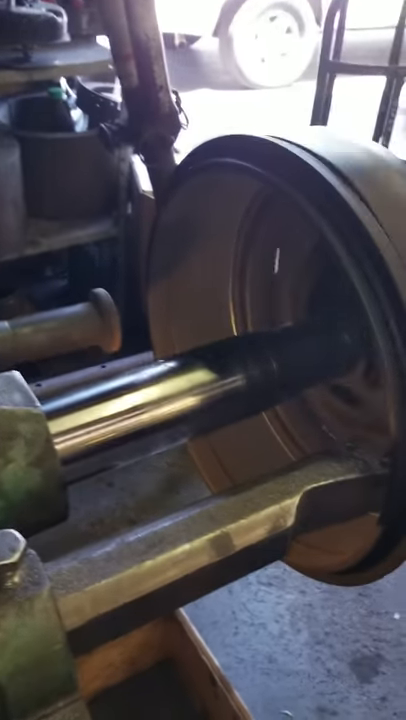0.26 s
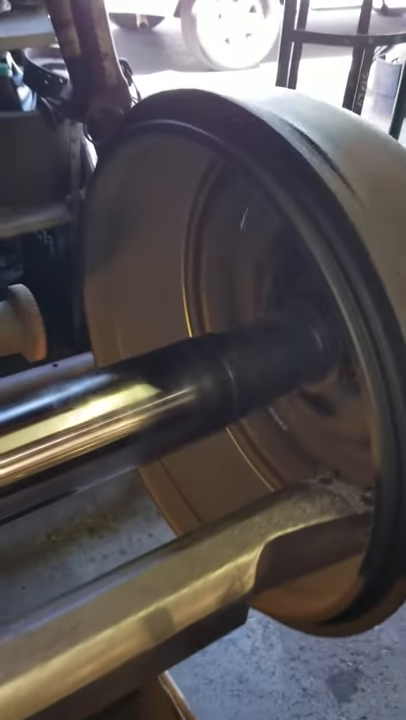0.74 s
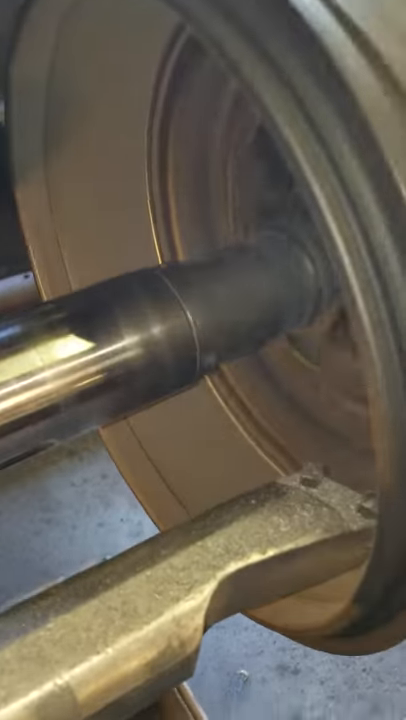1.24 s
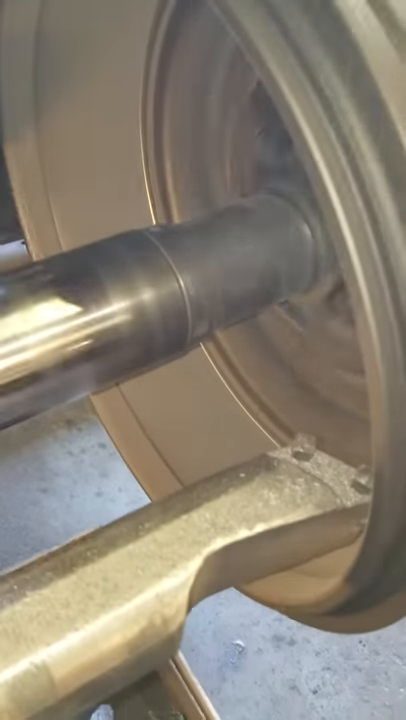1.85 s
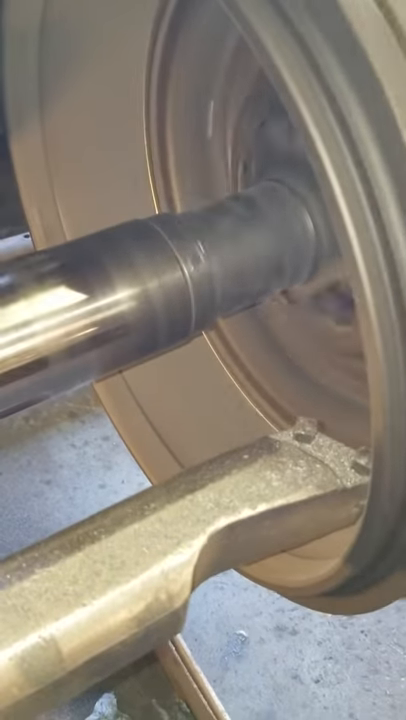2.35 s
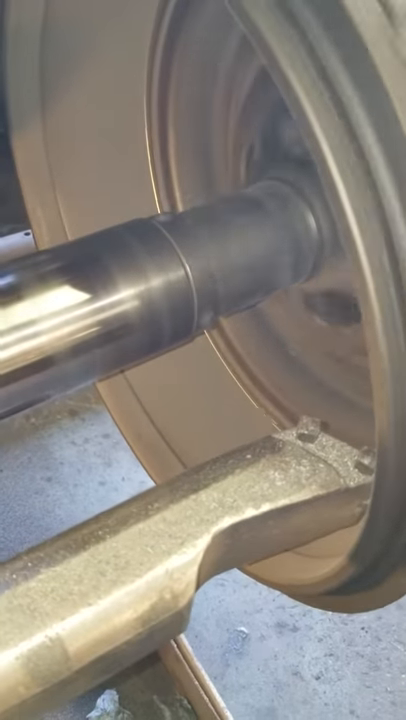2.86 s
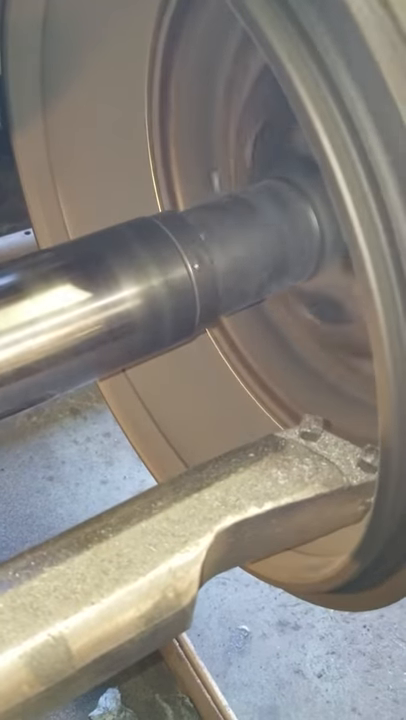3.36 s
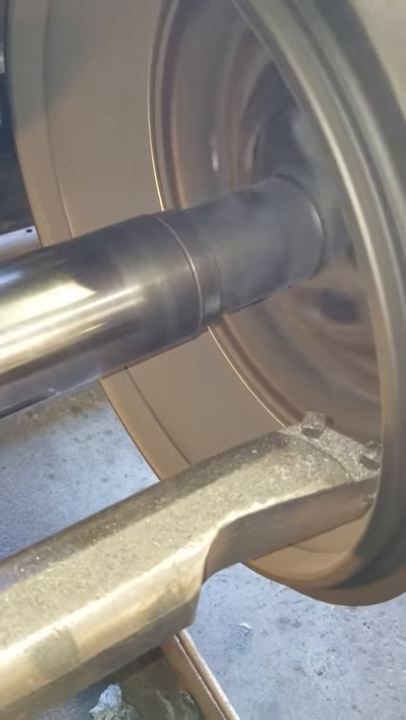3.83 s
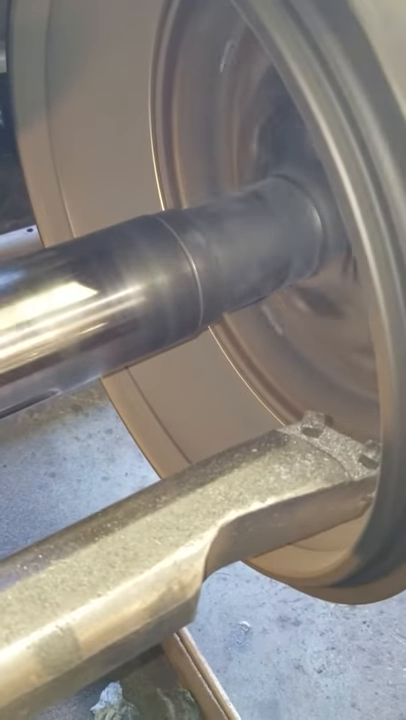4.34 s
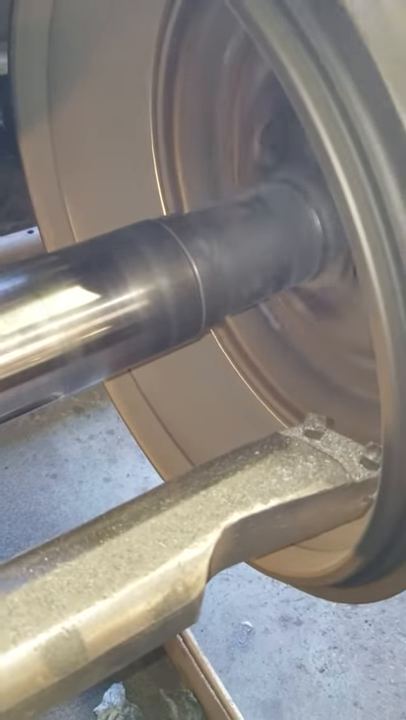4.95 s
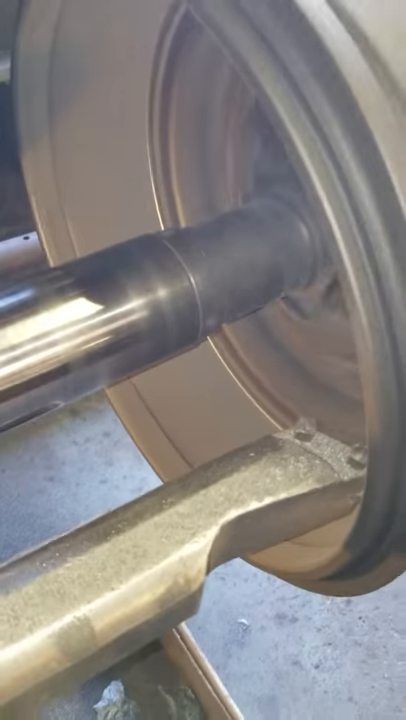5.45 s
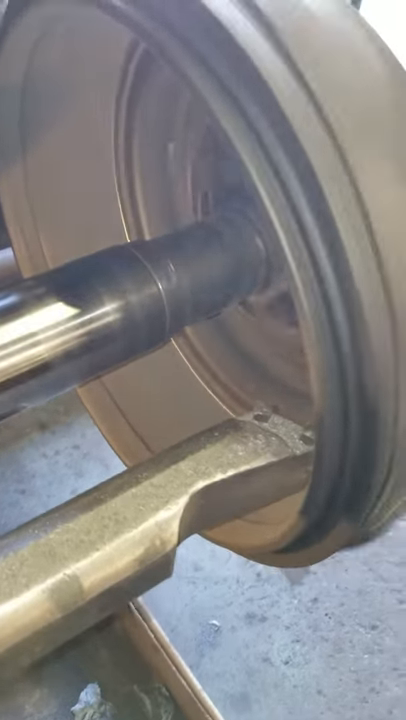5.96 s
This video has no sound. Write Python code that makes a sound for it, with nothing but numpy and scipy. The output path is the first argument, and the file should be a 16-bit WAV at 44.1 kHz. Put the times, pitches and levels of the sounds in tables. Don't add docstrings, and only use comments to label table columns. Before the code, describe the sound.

A brake lathe skims a spinning metal drum with a ragged, very high metallic squeal over a low motor rumble and hum in a workshop.

```python
import sys
import numpy as np
from scipy import signal
from scipy.io import wavfile

SR = 44100
rng = np.random.default_rng(int(sys.argv[2]) if len(sys.argv) > 2 else 0)


def gain_from_db(level_db):
    decades = np.asarray(level_db, float) / 20
    return 10 ** decades


def unload_wav(signal):
    wavfile.write(
        sys.argv[1],
        SR,
        np.round(np.clip(np.atleast_2d(signal).T, -1, 1) * 32767).astype(np.int16),
    )


N = 273420
STEP = 60
STEPS = N // STEP

# t/s, stance (0 far, 1 close, 2 backing off)
STANCE = [
    (0, 0.),
    (.6, 0.56),
    (.9, 1.3),
    (1.15, 1.3),
    (1.4, 1.04),
    (4.9, 1.1),
    (5.3, 1.24),
    (5.65, 1.4),
    (6.2, 2.1),
]


def in_time(rows):
    s, *columns = np.transpose(rows)
    return [np.interp(np.arange(STEPS) * STEP / SR, s, column) for column in columns]


def at_hz(points, hz):
    f, value = np.transpose(points)
    return np.interp(np.log(hz), np.log(f), value)


def rms_one(x):
    return x / np.sqrt(np.mean(np.abs(x) ** 2) + 1e-20)


def drift(rate_hz):
    r = np.exp(-2 * np.pi * rate_hz * STEP / SR)
    settle = 500
    noise = rng.standard_normal(STEPS + settle)
    return rms_one(signal.lfilter([1], [1, -2 * r, r * r], noise)[settle:])


def scaled(x, control):
    return (x.reshape(STEPS, STEP) * control[:, None]).ravel()


def swells(rows):
    t = np.arange(STEPS) * STEP / SR
    return sum(db * np.exp(-(2 * (t - s) / length) ** 2) for s, db, length in rows)


def mode(force, hz, width_hz):
    pole = np.exp((-np.pi * width_hz / .644 + 2j * np.pi * hz) / SR)
    return np.sqrt(2) * rms_one(signal.lfilter([1], [1, -2 * pole, pole * pole], force))


def cutting_force(count, chip_db, runout_db):
    turns_per_s = 2
    turn = np.sin(2 * np.pi * turns_per_s * np.arange(STEPS) * STEP / SR + 1.3)
    return [scaled(rng.standard_normal(N), gain_from_db(chip_db * drift(19.3) + runout_db * turn))
            for _ in range(count)]


def ringing(modes, force, gain_db, flicker_db):
    out = np.zeros((2, N))
    (stance,) = in_time(STANCE)
    for k, (hz, width_hz, *levels_db, pan_db, far, close, back) in enumerate(modes):
        ring = mode(force[k % len(force)], hz, width_hz)
        level_db = np.interp(stance, [0, 1, 2], levels_db) + gain_db + flicker_db * drift(5.8)
        lead_rad = np.interp(stance, [0, 1, 2], [far, close, back]) + 0.21 * drift(3.1)
        out[0] += scaled(ring.real, gain_from_db(level_db + pan_db / 2))
        out[1] += scaled(ring, gain_from_db(level_db - pan_db / 2) * np.exp(-1j * lead_rad)).real
    return out


def cutting():
    # f/Hz, width/Hz, level far/dB, close/dB, backing off/dB, left-right/dB, left lead far/rad,
    # close/rad, backing off/rad
    bell_modes = [(1586.4, 31, -36, -35.5, -34.5, 8, 0.61, 0.065, 0),
                  (1645, 47, -40, -32.5, -33.5, 0, 1.7, 0.54, 1.3)]
    drum_and_low_bit_modes = [(685, 60, -40.5, -42, -46.5, 0.5, -2.2, 0.73, 0.5),
                               (869.5, 39, -43, -41.5, -46, 2.5, -2.4, -1.5, -2.7),
                               (1110, 247, -44.5, -43.5, -46.5, 1, -2.5, -0.4, -1.5),
                               (1397, 330, -41, -39, -46, -1, -1, -3, -3),
                               (2136, 380, -42.5, -42.5, -47, 3.5, 1, 2, 2),
                               (2285, 114, -49, -46.5, -51, 9, 1.5, -4, -1.5),
                               (2431, 65, -34.5, -44.5, -39, -3.5, 1.5, 1.05, -1.6),
                               (2630, 86, -50, -46, -41, 9, -2, -3.5, 1),
                               (2898, 78, -30, -31, -30, 4.5, 1, -2, -2),
                               (3095, 69, -50, -36.5, -46, 0.5, 2.5, -2.5, -2),
                               (3254, 62, -31.5, -37.5, -35.5, 2.5, 0.6, 3.5, 4),
                               (3387, 57, -41, -39.5, -43, 7, -2.5, -0.4, -5),
                               (3510, 103, -41, -38.5, -44, -2, -3, -1.5, -1),
                               (3787, 38, -45.5, -43.5, -42, -10, -1.5, -1.1, -2.5),
                               (4020, 130, -43, -42, -49, -9, 2.5, 2, 16),
                               (4320, 120, -35, -35, -38.5, 2.5, -2, -2.5, -2.5),
                               (4545, 230, -46, -42, -48, 10.5, -4, 0.9, 1), (4910, 114, -40, -39.5, -39, 6, 0.5, 1, -2),
                               (5075, 120, -35, -48.5, -42, -2, -3.5, 1.3, -2),
                               (5432, 125, -36.5, -36, -30, 0, -9.5, -2.5, 1), (5720, 150, -40, -48, -48, -2, 4, 0.5, -3),
                              (5953, 41, -37.5, -33.5, -36.5, 5, 7, 2.4, -5),
                              (6180, 250, -34, -38.5, -40, -4, 2, 0.25, 9),
                              (6704, 160, -40, -33.5, -42, 3.5, 0.5, -2.5, -1.5),
                              (7040, 300, -37, -42, -40, 10.5, -2.5, -3, -1.5),
                              (7486, 320, -37, -41.5, -45, 11, -4, 2, 2), (7550, 100, -32.5, -37, -40, -6.5, 1, 2.5, 3),
                              (8200, 120, -44, -43, -46, 8, 4, -3, 1.5), (8560, 120, -41, -45, -52, -11, -0.5, -4.5, 4),
                              (8800, 200, -59, -58, -45, -5, 3.4, 0, 0)]
    shank_modes = [(9316, 320, -41, -39, -44, -11, 3.5, 0.7, 1),
                   (9590, 240, -31.5, -38, -32, 6.5, 2, -1.8, -2),
                   (9820, 150, -43, -38, -31, -6, 1, -1.5, -4.5),
                   (10120, 110, -36, -31.5, -36, -8, 3.5, -2, -2.5),
                   (10290, 120, -42, -41, -41, -1, 4.5, -1, -5),
                   (10470, 310, -39, -42.5, -40, 4, -5, -4.5, 4),
                   (11000, 200, -42, -60, -49, -3, -1, 7, 11),
                   (11130, 390, -37, -27.5, -27.5, 2, 1.5, 2, 2), (11170, 180, -47, -42, -44, 1, 3, -1, 4),
                   (12090, 180, -33, -29, -30, -5.5, 4, 1, 3),
                   (12500, 260, -42, -27.5, -45, 6, -16, -5.5, 3)]
    tip_modes = [(12730, 140, -29, -33, -30, -3, 2, -3.5, -8), (12570, 130, -32, -33, -32, 2, 1.5, 4, 3),
                 (13030, 110, -25.5, -26, -23, 4, 7, 1.5, -1),
                 (13150, 110, -34, -22.5, -28, 1.5, -3.5, 0.5, 4.5),
                 (13830, 220, -37, -34, -33, 4, 0, -3, -9), (13500, 140, -21, -28, -32, 2, 4, 0, 3),
                 (13940, 110, -25, -28.5, -29, -5, 0.6, -1.5, -4.5)]
    edge_modes = [(14120, 200, -33, -35.5, -40, -1, 9, 9.5, -5), (14500, 270, -43, -36, -45, 0, 1, 2.5, -5),
                  (14540, 130, -39, -35.5, -40, -1, 0.1, 1.5, -1),
                  (15450, 900, -34, -38, -46, 1, 11.3, 10, -13)]
    # t/s, level re mean/dB
    bite = [(0, 2), (.75, 0), (.85, -1.5), (1.2, -1), (1.6, -5.5), (1.9, -1), (2.3, 0), (3.1, 2.5),
            (3.2, -1), (3.5, 1), (4.2, 0), (4.6, -1.5), (5.2, -2), (5.6, 0), (5.95, -2), (6.2, 0)]
    # t/s, level/dB, length/s
    flares = [(.58, 1, .06), (.72, 7.5, .08), (.93, 3, .06), (1.3, 9.5, 0.19), (2.0, 1.5, .05),
              (2.4, 3, 0.12), (2.52, 1.5, 0.067), (4.85, 3, 0.11), (5.31, 8, .04), (5.39, 6.5, .08),
              (5.54, 0, .08), (6.12, 3, .05)]
    # t/s, level/dB
    grabs = [(.29, 7), (.7, 7.5), (.85, 7), (.95, 1.5), (1.04, 9), (1.08, 2.5), (1.18, 7.5), (1.44, 10),
             (2.47, -2), (2.72, 0.5), (3.07, -9), (3.25, 7), (3.58, 0.5), (3.97, -0.5), (4.33, 3),
             (4.58, 3), (4.98, -1), (5.28, 9), (5.4, 7), (5.57, 0), (6.07, 2)]

    grab_s = 0.035
    grab_db = swells([(s, db, grab_s) for s, db in grabs])
    squeal_db = in_time(bite)[0] + swells(flares)
    force = cutting_force(count=5, chip_db=1.79, runout_db=0.34)

    bell = ringing(bell_modes, force, grab_db - 2.5, flicker_db=1.4)
    drum = ringing(drum_and_low_bit_modes, force, 0.26 * grab_db - 1.0, flicker_db=1.37)
    shank = ringing(shank_modes, force, 0.12 * squeal_db - 0.4, flicker_db=1.1)
    edge = ringing(edge_modes, force, 0.3 * squeal_db + 0.2, flicker_db=1.5)
    tip = ringing(tip_modes, force, squeal_db - 0.3, flicker_db=0.9)
    return bell + drum + shank + edge + tip


def shop(x):
    t60_s, wall_cut_hz, first_return_s = 0.56, 9400, 0.006
    t = np.arange(SR // 2) / SR
    tails = rng.standard_normal((2, len(t))) * gain_from_db(-60 * t / t60_s) * (t > first_return_s)
    tails /= np.sqrt(np.sum(tails ** 2, axis=1, keepdims=True))
    lead_in = x[:, :len(t)][:, ::-1]
    wet = signal.fftconvolve(np.concatenate([lead_in, x], axis=1), tails, axes=1)[:, len(t):len(t) + N]
    return signal.sosfilt(signal.butter(1, wall_cut_hz, fs=SR, output="sos"), wet)


def gear():
    hz = np.repeat(266.4 + 2.5 * drift(4.0), STEP)
    tone = np.sqrt(2) * np.sin(2 * np.pi * np.cumsum(hz) / SR)
    return scaled(tone, gain_from_db(-10 + 1.6 * drift(4.0)))


def motor():
    # f/Hz, level per Hz/dB
    rumble = [(13, -60), (22, -30), (109, -2.5), (232, -4), (262, 1.5), (544, -7.5), (677, -23),
              (762, -2.5), (875, -14.5), (1300, -25), (1620, -23), (1860, -30.5), (2500, -18), (3250, -42),
              (5500, -120)]
    # f/Hz, width/Hz, level/dB
    frame_modes = [(265, 20, -8.5), (59.6, 4, -14.5), (105.5, 11, -7), (129.3, 18, -7), (160, 12, -8.5),
                   (211, 12.5, -5), (334, 11.2, -5), (416.3, 18.3, -4.5)]
    # f/Hz, correlation
    likeness = [(60, 0.99), (130, 0.93), (290, 0.75), (640, 0.45), (1410, 0.093), (3100, -0.12),
                (6820, -0.04), (15000, -0.02)]
    # f/Hz, left-right/dB
    lean_left = [(60, 0.0), (180, 2.0), (550, 0.69), (1650, 1.8), (4970, 1.5), (15000, 0.5)]
    # t/s, rumble level/dB
    load = [(0, -29), (.45, -32), (.75, -32), (1, -30), (1.5, -33.5), (2.4, -31.5), (2.6, -33), (2.83, -31),
            (3.1, -33), (4.2, -33), (4.7, -32), (5.1, -34.5), (5.9, -32), (6.2, -32.5)]
    thrum_far_db = 2.5
    hum_follows = 0.97

    (rumble_db,) = in_time(load)
    (stance,) = in_time(STANCE)
    thrum_db = thrum_far_db * (np.abs(stance - 1) - 1.7)
    white = rng.standard_normal((2, 2, N))
    band_hz = 20 * 2 ** (np.arange(22) / 3)
    out = np.zeros((2, N))
    for k, (low, high) in enumerate(zip(band_hz, band_hz[1:])):
        band = signal.butter(2, [low, high], "band", fs=SR, output="sos")
        mid, side = signal.sosfilt(band, white[k % 2])
        hz = np.sqrt(low * high)
        alike = np.clip(at_hz(likeness, hz), -1, 1)
        lean = gain_from_db(at_hz(lean_left, hz) / 2)
        gain = gain_from_db(at_hz(rumble, hz) + 0.7 * drift(3.4) + thrum_db * (hz < 110))
        mid = scaled(mid, gain * np.sqrt(1 + alike))
        side = scaled(side, gain * np.sqrt(1 - alike))
        out += [(mid + side) * lean, (mid - side) / lean]

    hum = gear()
    for k, (hz, width_hz, level_db) in enumerate(frame_modes):
        shake = white[k % 2, 0, ::-1]
        hum += gain_from_db(level_db - 7.5) * mode(shake, hz, width_hz).real
    hum = scaled(hum, gain_from_db(hum_follows * (rumble_db - rumble_db.mean())))
    out = rms_one(out) + hum * gain_from_db([[1.2], [-1.2]])
    return np.array([scaled(port, gain_from_db(rumble_db - 0.5)) for port in out])


def scene():
    cut = cutting()
    return gain_from_db(-1.2) * cut + gain_from_db(-4.5) * shop(cut) + motor()


def roll_off(x):
    return signal.sosfilt(signal.butter(12, 15780, fs=SR, output="sos"), x)


def record(dry):
    ports = signal.sosfilt(signal.butter(1, 30, "high", fs=SR, output="sos"), dry)
    return roll_off(ports)


dry = scene()
out = record(dry)
unload_wav(out)
```